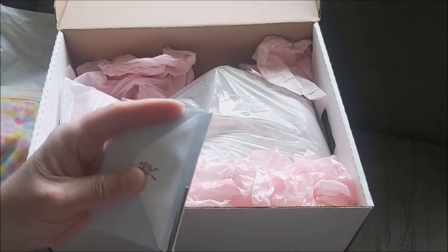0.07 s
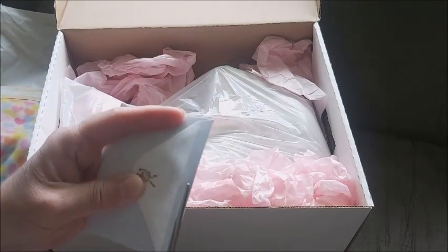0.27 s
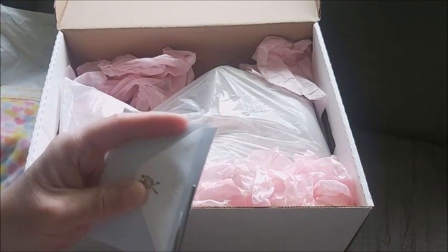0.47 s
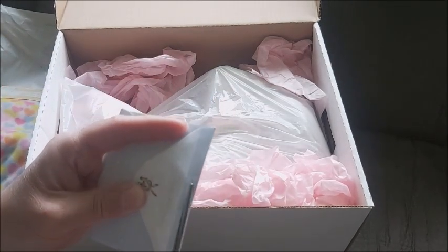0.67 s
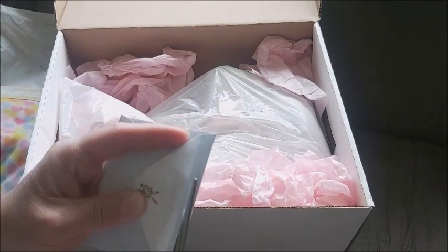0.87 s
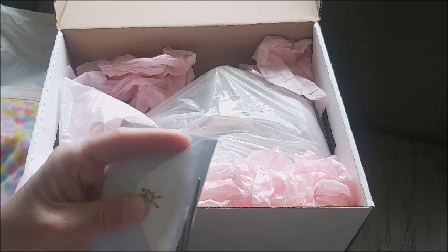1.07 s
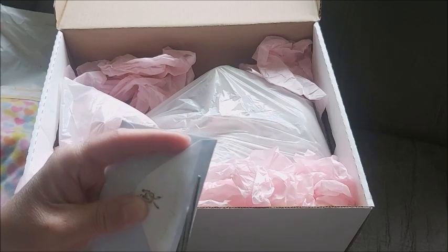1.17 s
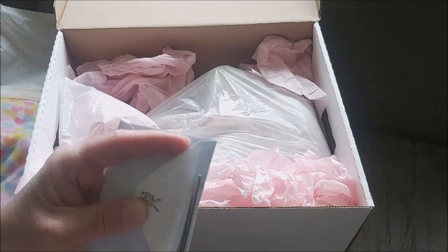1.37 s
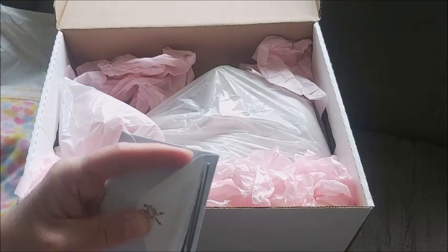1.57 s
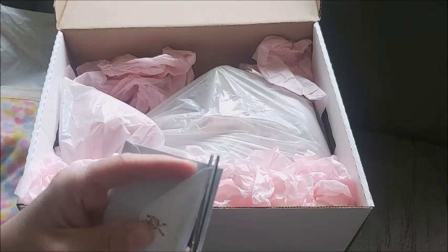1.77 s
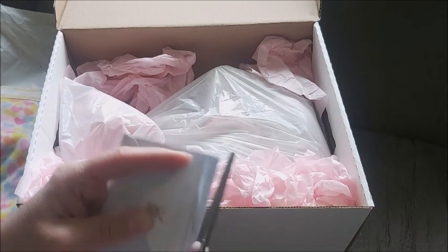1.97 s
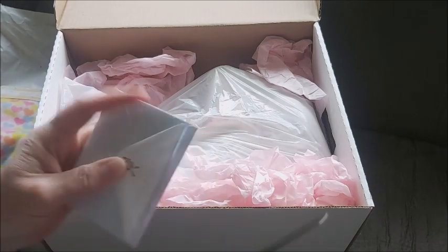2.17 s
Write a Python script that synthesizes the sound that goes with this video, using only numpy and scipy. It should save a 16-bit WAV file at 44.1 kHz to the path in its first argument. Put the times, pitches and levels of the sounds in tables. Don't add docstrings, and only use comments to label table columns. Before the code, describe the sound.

Close, dry snipping of paper: each closing stroke rips fibres jerkily, each opening stroke hisses steel on steel, with clacks near one and two seconds, over soft indoor room tone and a thin faint whistle.

```python
import sys
import numpy as np
from scipy import signal
from scipy.fft import rfft, irfft, next_fast_len
from scipy.io import wavfile
from scipy.ndimage import map_coordinates

SR = 44100
rng = np.random.default_rng(int(sys.argv[2]) if len(sys.argv) > 2 else 0)


def how_loud(loudness_db):
    steps = np.asarray(loudness_db, float) / 20
    return 10 ** steps


def materialize(psi):
    bounded = np.clip(np.atleast_2d(psi).T, -1, 1)
    quanta = np.round(bounded * 32767).astype(np.int16)
    wavfile.write(sys.argv[1], SR, quanta)


N = 97990


def unit(x):
    return x / np.sqrt(np.mean(x ** 2) + 1e-20)


def along(points, hz):
    f, v = np.transpose(points)
    return np.interp(np.log(hz + 1), np.log(f + 1), v)


def held(rows):
    rows = np.array(rows)
    row = np.searchsorted(rows[:, 0], np.arange(N) / SR, "right") - 1
    return rows[np.clip(row, 0, None), 1:].T


def filtered(x, response):
    m = next_fast_len(N + 8192)
    return irfft(rfft(x, m) * response(np.fft.rfftfreq(m, 1 / SR)), m)[..., :N]


def resonant(peaks):
    def raw(f):
        total = 0
        for k, (hz, width_hz, db) in enumerate(peaks):
            damping = 1j * f * width_hz
            total = total + (-1) ** k * how_loud(db) * damping / (hz * hz - f * f + damping)
        return total

    return lambda f: raw(f) / np.sqrt(np.mean(abs(raw(f)) ** 2))


def wobble(rate_hz):
    knots = rng.standard_normal(int(N * rate_hz / SR) + 4)
    return map_coordinates(knots, [np.arange(N) * rate_hz / SR])


def grit(spiky_db):
    size_db = spiky_db * (rng.exponential(size=N) / 2 + wobble(1500))
    return unit(rng.standard_normal(N) * how_loud(size_db))


def gate(start_s, length_s, rise_s, fall_s):
    out, a = np.zeros(N), max(round(start_s * SR), 0)
    t = np.arange(a, min(N, a + round((length_s + 12 * fall_s) * SR))) / SR - start_s
    release = np.exp(-np.clip(t - length_s, 0, None) / fall_s)
    out[a:a + len(t)] = np.clip(t / rise_s, 0, 1) ** 2 * release
    return out


# hz, density_db
TONE_COLOUR = [(30, -17.5), (90, -15.5), (200, -11), (400, -15.5), (1000, -34), (3000, -29), (5000, -23.5),
               (15000, -32.5)]
# hz, share
LIKENESS = [(60, 0.18), (250, 0.52), (600, 0.21), (5000, 0.078)]
# centre_hz, width_hz, level_db
HUM_BAND = (89, 21, -77)
WHISTLE_BAND = (1908, 180, -1.7)
# time_s, level_db
WHISTLE_CURVE = [(0, -83), (.2, -75), (.34, -70.5), (.45, -79), (.55, -78), (.66, -93), (.69, -66),
                 (.76, -80), (.93, -63.5), (1.18, -71.5), (1.26, -100), (2.04, -77), (2.08, -64),
                 (2.22, -64.5)]
TONE_DB, HUM_STEADY_DB, WHISTLE_RIGHT_DB = -70.5, -81, -8.5


def room_tone():
    common, left, right, hum_noise, whistle_noise = rng.standard_normal((5, N))
    t = np.arange(N) / SR

    def colour(f):
        return how_loud(along(TONE_COLOUR, f))

    def share(f):
        return np.clip(along(LIKENESS, f), 0, 1)

    def narrow(x, hz, width_hz, db):
        return how_loud(db) * unit(filtered(x, lambda f: resonant([(hz, width_hz, 0)])(f) ** 2))

    broad = filtered(common, lambda f: colour(f) * np.sqrt(share(f)))
    broad = broad + filtered(np.array([left, right]), lambda f: colour(f) * np.sqrt(1 - share(f)))
    steady = np.sqrt(2) * np.sin(2 * np.pi * HUM_BAND[0] * t + 2.1 * wobble(7.84))
    hum = narrow(hum_noise, *HUM_BAND) + how_loud(HUM_STEADY_DB) * steady
    side_hum = narrow(left, 92, 40, -85)
    whistle_db = np.interp(t, *np.transpose(WHISTLE_CURVE)) + 2.2 * wobble(40)
    whistle = narrow(whistle_noise, *WHISTLE_BAND) * how_loud(whistle_db)
    out = how_loud(TONE_DB) * unit(broad) + hum * how_loud([[-.7], [.7]])
    return out + np.outer([1, -1], side_hum) + whistle * how_loud([[0], [WHISTLE_RIGHT_DB]])


# centre_hz, width_hz, level_db
SHEET_PEAKS = [(383, 81, 0)]
PAPER_PEAKS = [(606, 260, 0)]
CREASE_PEAKS = [(1044, 470, 0)]
BLADE_PEAKS = [(1860, 320, 0)]
EDGE_PEAKS = [(3796, 100, 2), (5180, 1740, 6.5), (2820, 1620, -6.5)]
TWANG_PEAKS = [(6320, 245, 0)]
AIR_PEAKS = [(9900, 9460, 0), (12500, 7140, 0.041)]
# start_s, over_paper_db
SHEET_CURVE = [(0, -7.5), (.3, -1.5), (.64, 1.5), (.8, -1), (1.0, -16), (1.26, -21), (1.43, -21), (1.64, 3),
               (1.74, 6)]
# start_s, level_db
TWANG_CURVE = [(0, -50), (.7, -36), (1.0, -24), (1.345, -4), (1.43, -22), (1.55, -28), (1.74, -35)]


def voiced(drive, paper_db, crease_db, ring_db, air_db):
    sheet_db = paper_db + held(SHEET_CURVE)[0]
    twang_db = held(TWANG_CURVE)[0]
    parts = [(SHEET_PEAKS, sheet_db), (PAPER_PEAKS, paper_db), (CREASE_PEAKS, crease_db),
             (BLADE_PEAKS, ring_db), (EDGE_PEAKS, 0), (TWANG_PEAKS, twang_db), (AIR_PEAKS, air_db)]
    return sum(filtered(drive * how_loud(db), resonant(peaks)) for peaks, db in parts)


# start_s, paper_db, crease_db, ring_db, air_db
STROKE_COLOUR = [(0, -19, -9, -12, -1.5), (.3, -12, -15.5, -8, -4), (.64, -2, -32, -15, -6.5),
                 (.708, -13.5, -22, -11.5, -4.5), (.8, -35, -34, -31, -10), (.87, -30, -30, -27, 1),
                 (1.0, -12, -26, -9, -2), (1.26, -13, -29, -8.5, -3), (1.345, -17, -19.5, -14, -1),
                 (1.55, -34, -14, -21, -1), (1.612, -9, -22, -25, -0.5), (1.645, -23, -14, -17, 2.5),
                 (1.85, -29, -10.5, -19, 3), (1.92, -19.5, -10, -12, -1.5), (2.0, -43, -37, -26, -6.5),
                 (2.17, -47, -47, -27, 2.5)]
# start_s, length_s, level_db
BITES = [(.001, 0.0029, -46), (.005, 0.0021, -43), (0.011, 0.0098, -46.5), (0.021, 0.0088, -44),
         (.039, 0.0017, -49), (0.05, 0.0021, -47), (0.33, 0.0016, -64.5), (0.359, 0.0059, -48),
         (0.366, 0.0058, -46), (.372, 0.0024, -45.5), (0.378, 0.0036, -46.5), (0.383, 0.004, -45.5),
         (0.402, 0.0023, -47.5), (0.404, 0.0056, -46), (0.415, 0.0015, -50), (0.7108, 0.0041, -40.5),
         (0.724, 0.0023, -36), (0.7259, 0.0028, -36), (0.7304, 0.00033, -39.5), (0.731, 0.0014, -40),
         (0.742, 0.003, -37), (0.7476, 0.0023, -38), (.752, 0.0015, -39), (0.821, 0.0013, -49.5),
         (0.91, 0.0023, -51.5), (1.025, 0.0019, -39.5), (1.0275, 0.0029, -37.5),
         (1.0368, 0.0011, -31), (1.047, 0.0026, -34),
         (1.28, 0.0056, -49), (1.292, 0.0046, -43), (1.3027, 0.0013, -43), (1.307, 0.00084, -47),
               (1.311, 0.0023, -48.5), (1.321, 0.0066, -32), (1.329, 0.0055, -47), (1.334, 0.0048, -44.5),
               (1.35, 0.015, -36), (1.362, 0.0052, -57), (1.418, 0.0016, -56.5), (1.424, 0.0027, -58),
               (1.577, 0.0098, -49), (1.587, 0.004, -41.5), (1.596, 0.014, -41.5), (1.615, 0.017, -42.5),
               (1.634, 0.0033, -47), (1.647, 0.00091, -62), (1.648, 0.00095, -34), (1.651, 0.0066, -44.5),
               (1.658, 0.0046, -42.5), (1.663, 0.0032, -39.5), (1.867, 0.0066, -46), (1.877, 0.0066, -52),
               (1.89, 0.005, -44), (1.897, 0.00093, -57), (1.906, 0.0056, -45.5), (1.911, 0.002, -39),
               (1.919, 0.019, -45), (1.927, .001, -47), (1.9481, 0.0025, -28.5), (1.953, 0.00047, -36),
               (1.9552, 0.00033, -31.5), (1.96, 0.00091, -52), (2.028, 0.0036, -36), (2.067, 0.0033, -49),
               (2.073, 0.003, -53), (2.175, 0.0047, -47)]
# start_s, length_s, level_db
SHEARING = [(0, 0.045, -52), (0.311, 0.03, -68), (0.357, 0.059, -53.5), (0.649, 0.0095, -76),
            (0.667, 0.028, -63), (0.709, 0.037, -54), (0.997, 0.042, -54), (1.275, 0.056, -62),
            (1.602, 0.065, -48), (1.862, 0.055, -58.5), (1.945, .06, -56)]
RISE_S, FALL_S = 0.0017, 0.0071
BITE_RISE_SHARE, BITE_FALL_S = 0.17, 0.00096
TEAR_SPIKY_DB, SHEAR_SPIKY_DB = 2.6, 1.5


def cutting():
    fibres, bites = grit(TEAR_SPIKY_DB), 0
    for start_s, length_s, db in BITES:
        grip = gate(start_s, length_s, min(BITE_RISE_SHARE * length_s, .003), BITE_FALL_S)
        bite = grip * fibres
        bites = bites + how_loud(db) * bite * np.linalg.norm(grip) / np.linalg.norm(bite)
    press = sum(how_loud(db) * gate(start_s - RISE_S, length_s, RISE_S, FALL_S)
                for start_s, length_s, db in SHEARING)
    shear = press * grit(SHEAR_SPIKY_DB) * how_loud(0.5 * wobble(120))
    return voiced(bites + shear, *held(STROKE_COLOUR))


# start_s, length_s, level_db, paper_db, air_db
OPENING_SLIDES = [(0.127, 0.033, -60.5, -26, -11), (0.145, 0.056, -54, -15.5, -2),
                  (0.205, 0.059, -69.5, -25, -3), (0.477, 0.086, -55.5, -14, -3.5),
                  (0.57, 0.052, -66.5, -25, -7), (.826, 0.074, -48, -13.5, -3),
                  (0.913, 0.068, -73, -2, -17), (1.126, 0.075, -52.5, -10, -4), (1.215, 0.059, -63, -5, -7),
                  (1.432, 0.084, -40, -23, 0), (1.745, 0.072, -42.5, -48, 0.5),
                  (2.034, 0.058, -56, -39, 0.5), (2.099, 0.064, -58, -36, 3)]
# peak_at_share, start_db, crease_db, ring_db
OPENING_SHAPES = [(0.78, -11, -18, -20), (0.53, -13, -20.5, -22), (.44, -12, -12, -15),
                  (0.33, -17, -30, -14), (0.99, -9, -15, -19), (0.47, -14, -26, -10.5), (0.56, -8, -11, -4),
                  (0.19, -12, -41, -12), (0.32, -8, -41, -14), (0.96, -10.5, -27.5, -23),
                  (0.69, -12, -22.5, -24), (0.65, -15, -19.5, -15), (0.82, -11, -20, -14)]
END_DB, SLIDE_SPIKY_DB, FLUTTER_DB = -8.5, .7, 0.38


def opening():
    t, press, colours = np.arange(N) / SR, 0, []
    for slide, shape in zip(OPENING_SLIDES, OPENING_SHAPES):
        start_s, length_s, db = slide[:3]
        peak_share, start_db, crease_db, ring_db = shape
        peak_s = start_s + np.clip(peak_share, .05, .95) * length_s
        off_peak = np.interp(t, [start_s, peak_s, start_s + length_s], [1, 0, 1])
        swell_db = np.where(t < peak_s, start_db, END_DB) * off_peak ** 2
        press = press + how_loud(db + swell_db) * gate(start_s, length_s, RISE_S, FALL_S)
        colours.append((start_s, slide[3], crease_db, ring_db, slide[4]))
    rub = press * grit(SLIDE_SPIKY_DB) * how_loud(FLUTTER_DB * wobble(90))
    return voiced(rub, *held(colours))


# time_s, level_db
CLACK_TIMES = [
    (0.9611, -17.5),
    (1.9455, -10),
]
# pitch_hz, level_db, t60_s
BLADE_MODES = [
    [(1875, 0.5, 0.013), (4100, -3, 0.016), (5040, 4.5, 0.008), (6180, -3, 0.012), (7570, -11.5, 0.0087),
     (564, -16.5, 0.01), (1080, -17, 0.018)],
    [(4600, 20.5, 0.0021), (1280, -22.5, 0.014), (1570, -11.5, 0.0056), (2170, -17.5, 0.008),
     (292, -25.5, 0.034), (7140, -17, 0.0076), (10860, -8, 0.0067)],
]
# rise_s, length_s, level_db, centre_hz
CRACKS = [
    (0.00093, 0.0037, -10, 4100),
    (0.00082, 0.0013, -7, 8600),
]
# (centre_hz, width_hz, level_db)
SHIVERS = [
    (-44.5, 0.27, [(2130, 210, -3.5), (5340, 3700, -14.5), (515, 380, -5.5)]),
    (-35.5, 0.3, [(4150, 780, 5.5), (9000, 8400, -49), (285, 74, -1.5)]),
]


def clacks():
    out, t = np.zeros(N + SR), np.arange(SR // 8) / SR
    for (at_s, db), modes, burst, shiver in zip(CLACK_TIMES, BLADE_MODES, CRACKS, SHIVERS):
        rise_s, length_s, crack_db, crack_hz = burst
        shiver_db, shiver_t60_s, bands = shiver
        ring = 0
        for hz, mode_db, t60_s in modes:
            ring = ring + how_loud(mode_db - 60 * t / t60_s) * np.sin(2 * np.pi * (hz * t + rng.random()))
        out[round(at_s * SR):][:len(t)] += how_loud(db + 3.5) * ring * (1 - np.exp(-(t / rise_s) ** 2))
        crack = gate(at_s - rise_s / 2, rise_s, rise_s, length_s) * rng.standard_normal(N)
        out[:N] += how_loud(db + crack_db) * filtered(crack, resonant([(crack_hz, crack_hz, 0)]))
        rattle = gate(at_s, 0.0012, 0.001, shiver_t60_s / np.log(1000)) * grit(1.4)
        out[:N] += how_loud(shiver_db) * filtered(rattle, resonant(bands))
    return out[:N]


BOX_T60_S = .007


def box_echoes():
    n = 400
    h = rng.standard_normal((2, n)) * how_loud(-60 * np.arange(n) / SR / BOX_T60_S)
    return h / np.linalg.norm(h, axis=1, keepdims=True)


# hz, t60_s
ROOM_DECAY = [(300, 0.2), (1500, .2), (4500, 0.12), (10000, 0.15)]


def room_tail():
    hz, t, z = signal.stft(rng.standard_normal((2, 14000)), SR, nperseg=64)
    t60_s = along(ROOM_DECAY, hz)[:, None]
    h = signal.istft(z * how_loud(-60 * t / t60_s), SR, nperseg=64)[1]
    return h / np.linalg.norm(h, axis=1, keepdims=True)


def add_echoes(out, send, step, db, echo, wait):
    for a in range(0, N - wait, step):
        wet = signal.fftconvolve(send[None, a:a + step], how_loud(db) * echo(), axes=1)[:, :N - a - wait]
        out[:, a + wait:a + wait + wet.shape[1]] += wet


# hz, level_db
PORT_TILT = [(250, -3.5), (500, 2), (1900, 0.5), (2900, -3.5), (3600, 2.5), (4500, 4.5), (6000, 1.5),
             (8500, -2.5), (13000, -0.5)]
# centre_hz, width_hz, level_db
WIDE_PEAKS = [(9400, 6900, 0)]
WIDE_HZ, WIDE_DB, KEPT_SHARE = 7340, 2.5, 0.53
LAG_S = 6 / 44100
LOW_CUT_HZ, BOX_CUT_HZ = 200, 1200
BOX_DB, ROOM_DB = -4, -9


def space(x, to_room):
    def high(f):
        return 1 / (1 + (WIDE_HZ / (f + 1)) ** 6)

    near = filtered(x, lambda f: 1 - (1 - KEPT_SHARE) * high(f))
    late = filtered(near, lambda f: np.exp(-2j * np.pi * f * LAG_S))
    out = np.array([near, late])
    spread = filtered(x, high) * np.sign(rng.standard_normal((2, N)))
    out += how_loud(WIDE_DB) * filtered(spread, lambda f: high(f) * resonant(WIDE_PEAKS)(f))
    treble = filtered(x, lambda f: 1j * f / (BOX_CUT_HZ + 1j * f))
    add_echoes(out, treble, 220, BOX_DB, box_echoes, 8)
    add_echoes(out, to_room, 2500, ROOM_DB, room_tail, 200)

    def ports(f):
        low_cut = (1j * f / (LOW_CUT_HZ + 1j * f)) ** 2
        return low_cut * how_loud(np.outer([.5, -.5], along(PORT_TILT, f)))

    return filtered(out, ports)


CLACK_ROOM_DB = -2.5


def scene():
    strokes, steel = cutting() + opening(), clacks()
    return space(strokes + steel, strokes + how_loud(CLACK_ROOM_DB) * steel) + room_tone()


def top_cut(x):
    return signal.sosfilt(signal.butter(12, 17010, fs=SR, output="sos"), x)


TOP_HZ, EDGE_HZ = 15900, 16900


def record(dry):
    mix = filtered(dry, lambda f: np.where(f < TOP_HZ, 1, 0.028 * (f < EDGE_HZ)))
    return top_cut(mix)


dry = scene()
out = record(dry)
materialize(out)
```